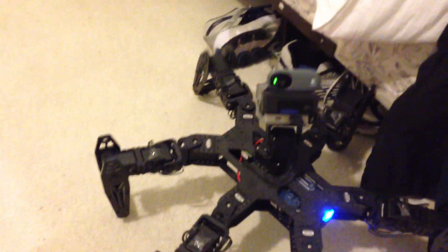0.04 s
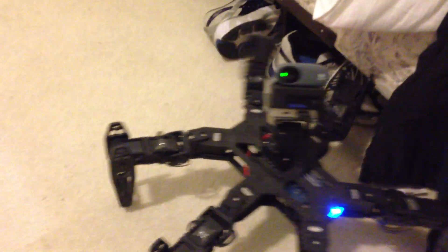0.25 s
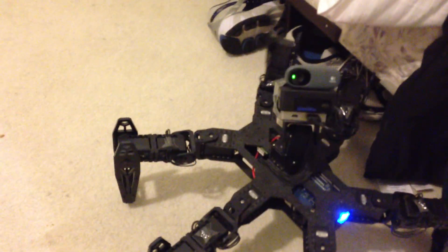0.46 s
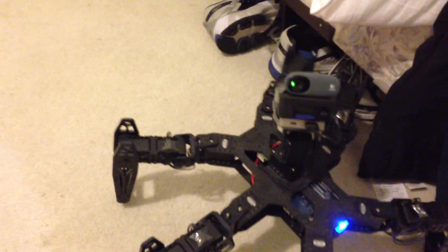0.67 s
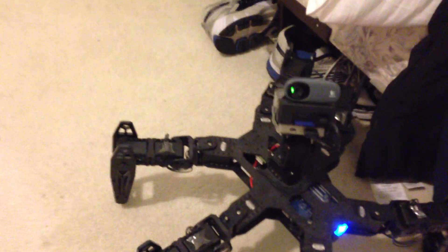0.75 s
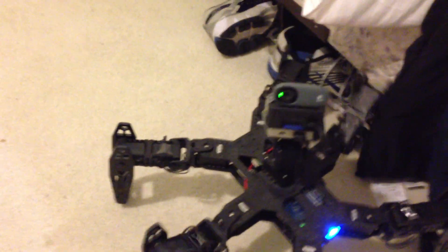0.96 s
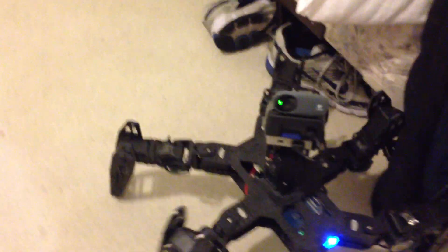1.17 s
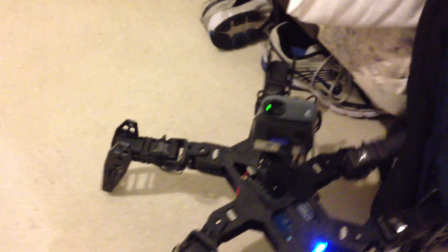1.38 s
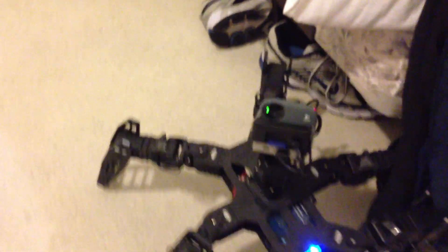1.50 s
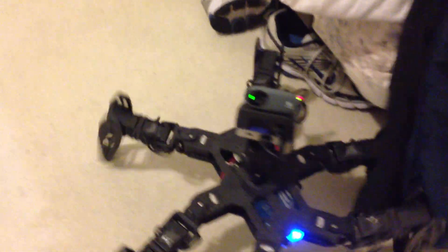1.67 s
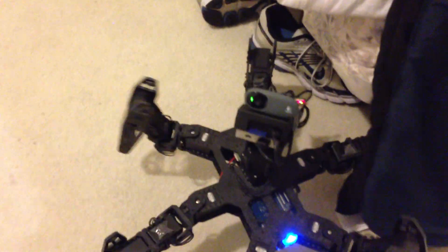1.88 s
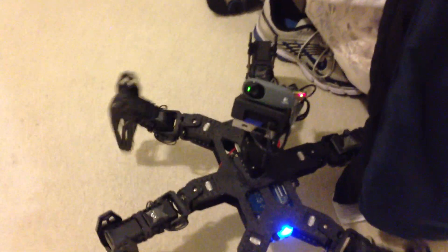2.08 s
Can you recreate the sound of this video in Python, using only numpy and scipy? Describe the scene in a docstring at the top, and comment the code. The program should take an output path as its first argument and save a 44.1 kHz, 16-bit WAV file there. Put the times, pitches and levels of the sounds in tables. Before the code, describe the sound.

A walking robot's servo motors rasp and whine in quick, even surges, with tiny gear squeaks. A few light plastic foot taps come around the middle. It is heard from about a metre in a small carpeted room with faint hiss.

```python
"""Six-legged robot walking on carpet

The robot walks about a metre away in a small, quiet room. On each stride its servos (the motors
in its joints) speed up and slow down, so their gear teeth rasp and whine, and the speed ripples
with every position command. Gears squeak, the leg frames ring along, the body rumbles and the
plastic feet tap now and then, over a faint hiss and hum."""
import sys
import numpy as np
from scipy import signal
from scipy.fft import rfft, irfft
from scipy.io import wavfile
from scipy.ndimage import uniform_filter1d

SR = 44100
rng = np.random.default_rng(int(sys.argv[2]) if len(sys.argv) > 2 else 0)


def materialize(psi):
    """Save the field psi as 16-bit PCM at rate SR to the path in sys.argv[1].

    A 1-D psi becomes a single channel; in a 2-D psi each row is a channel.
    """
    bounded = np.clip(np.atleast_2d(psi).T, -1, 1)
    quanta = np.round(bounded * 32767).astype(np.int16)
    wavfile.write(sys.argv[1], SR, quanta)


N = 94506

# The tone of the room's hiss. Each row: frequency in Hz, relative level in dB.
HISS_COLOUR = [(30, -24.5), (60, -16), (100, -8), (150, -3), (240, -1.5), (450, -8), (800, -8.5),
               (1500, -13.5), (2500, -13.5), (4000, -7.5), (7000, -21.5), (10000, -11.5), (15000, -21.5)]
# How loud the body rumbles. Each row: time in seconds, level in dB.
RUMBLE_LEVELS = [(0, -75.5), (.4, -87), (.5, -77.5), (.66, -70.5), (.76, -67.5), (.88, -76.5), (1.08, -73),
                 (1.25, -73), (1.4, -72.5), (1.6, -73.5), (1.8, -67.5), (2.14, -94)]
# The tone of the rumble. Each row: frequency in Hz, relative level in dB.
RUMBLE_COLOUR = [(100, -36.5), (160, -8.5), (205, 2.5), (270, -2.5), (340, 1), (480, -6.5), (800, -8),
                 (1400, -35.5)]
# Swells of ringing in the legs. Each row: start, peak and end in seconds, pitch in Hz, width in Hz,
# level in dB. Only rows whose times are in order give a full swell.
FRAME_RINGS = [(0.1453, 0.1336, 0.181, 2277, 78, -46), (0.0975, 0.1344, 0.272, 2950, 58, -58.5),
               (0.205, 0.25, 0.249, 2570, 197, -55.5), (0.18, 0.385, 0.415, 5870, 110, -58.5),
               (0.454, 0.5894, 0.607, 207.4, 56.3, -64.5), (0.4775, 0.494, 0.55, 1330, 810, -66.5),
               (0.4926, 0.564, 0.793, 5280, 414, -51.5), (0.61, 0.745, 0.833, 5524, 374, -56.5),
               (0.608, 0.606, 0.708, 4600, 350, -50), (0.58, 0.678, 0.697, 2290, 147, -57),
               (1.731, 1.72, 1.745, 2640, 300, -55.5), (1.682, 1.766, 1.827, 2400, 89, -59),
               (1.8, 1.63, 1.95, 4360, 1020, -47.5)]
# Feet landing. Each row: start in seconds, level in dB, pitch of the knock in Hz.
FOOT_TAPS = [(.7784, -33.5, 1800), (.7812, -45, 1050), (.985, -50.5, 1300), (.999, -49, 1200),
             (1.0165, -46, 1150), (1.190, -54, 1700), (1.2035, -41.5, 2200)]
# The notes of a struck leg. Each row: pitch in Hz, relative level in dB, seconds to fade by 60 dB.
LEG_NOTES = [(871, -16.5, 0.1), (978, -9.5, 0.0396), (1285, -19.5, 0.054), (1793, -22.5, 0.0296),
             (1974, -40, 0.032), (2755, -13, 0.034), (3220, -10.5, 0.0116)]
# The strides. Each row: start and end, then the rasp's rise and fall times, all in seconds; levels in dB
# of the rasp's body, treble and low mids; relative level in dB of the other servos' whine.
STRIDES = [(-.28, 0.056, .12, 0.1466, -47.5, -62, -55, -48.5),
           (0.069, 0.454, 0.1208, 0.1495, -52, -56.5, -63, -58),
           (.47, 0.842, 0.1493, 0.152, -52, -56, -64, -63.5),
           (0.844, 1.249, 0.1488, 0.1592, -50, -55.5, -63, -59),
           (1.248, 1.601, 0.0967, 0.1185, -52, -54.5, -65, -57),
           (1.616, 2.009, .11, 0.1815, -51, -54.5, -62.5, -58.5),
           (2.012, 2.38, 0.1277, .14, -51.5, -57, -67, -57)]
# The timing of the speed ripple. Each entry: the time in seconds of one crest, for one stride.
RIPPLE_CRESTS = [-.1, .249, .651, 1.061, 1.441, 1.771, 2.125]
# The rasp of servos holding a pose. The entries: body, treble and low mids, in dB.
HOLDING_DB = (-69.5, -79, -75)
# How steeply the rasp grows with effort. The entries: exponents for body, treble and low mids.
RASP_STEEPNESS = (1.937, 2.57, 1.38)
# The tone of the rasp through the gearbox cases. Each row: frequency in Hz, relative level in dB.
RASP_COLOUR = [(500, -26), (800, -22), (1200, -19.5), (1700, -10.5), (2300, -11.5), (2900, -10), (3250, -7),
               (3900, -2.5), (4700, -2), (5400, 1.5), (6200, -2.5), (7100, -2.5), (8000, -6), (9200, -16.5),
               (10500, -14), (12500, -10.5), (14400, -5.5), (15400, -5.5)]
# The tones in a whine. Each row: multiple of the tooth rate (teeth meeting a second), relative level in dB.
HARMONICS = [(1, -15), (2, -4.5), (3, -4.5), (4, -20), (5, -22), (6, -12)]
# Where a servo's case gives off sound best. Each row: frequency in Hz, width in Hz, boost in dB.
CASE_PEAKS = [(2770, 200, 6), (6970, 1640, 7)]
# The loudest servo, one list for each stride it leads.
# Each row: time in seconds, tooth rate in Hz, relative level in dB.
LEAD_WHINE = [
    [(.11, 1480, -63), (.15, 1450, -61), (.175, 1830, -60), (.205, 1960, -56), (.225, 2150, -59),
     (.25, 2350, -55), (.30, 1750, -60), (.39, 1400, -63)],
    [(.56, 1850, -66), (.61, 2150, -57), (.65, 2130, -57), (.68, 2080, -60), (.703, 2040, -52),
     (.725, 1740, -57), (.752, 1300, -58), (.775, 1250, -68)],
    [(.905, 1450, -62), (.935, 1320, -56), (.96, 1580, -60), (.987, 1990, -52), (1.012, 2330, -49),
     (1.04, 2210, -51), (1.064, 2340, -45), (1.087, 2190, -48), (1.108, 1990, -51), (1.137, 1730, -53),
     (1.15, 1680, -63)],
    [(1.29, 2100, -64), (1.32, 1950, -58), (1.34, 2150, -55), (1.365, 2100, -64), (1.39, 2200, -56),
     (1.442, 2280, -53), (1.47, 1850, -60), (1.495, 1480, -59), (1.52, 1320, -58), (1.565, 1350, -66)],
    [(1.68, 2000, -65), (1.735, 2200, -54), (1.752, 2240, -48), (1.772, 2300, -46), (1.797, 2280, -46),
     (1.806, 2090, -52), (1.82, 2060, -48), (1.85, 1840, -52), (1.873, 2230, -53), (1.905, 2150, -55),
     (1.925, 1950, -64)],
]

HISS_DB, HUM_HZ, HUM_DB = -66, 120, -83.5
COMMAND_HZ = 40.3  # position commands a second


def undb(db):
    """Turn decibels into a gain."""
    return 10 ** (np.asarray(db) / 20)


def unit(x):
    """Scale a sound to an average power of 1."""
    return x / np.sqrt(np.mean(x ** 2) + 1e-20)


def clock():
    """The time of each sample in seconds."""
    return np.arange(N) / SR


def noise():
    """Fresh white noise."""
    return rng.standard_normal(N)


def wobble(hz):
    """A smooth random wobble of about size 1, mostly slower than hz."""
    f = np.fft.rfftfreq(N, 1 / SR)
    return unit(irfft(rfft(noise()) / (1 + (f / hz) ** 2) ** 2, N))


def colour(x, points):
    """Shape a sound's tone by (Hz, dB) points, then scale it to a power of 1."""
    hz, db = np.array(points, float).T
    f = np.fft.rfftfreq(N, 1 / SR) + 1
    return unit(irfft(rfft(x) * undb(np.interp(np.log(f), np.log(hz), db)), N))


def band(x, low_hz, high_hz):
    """Keep only the frequencies between two limits."""
    f = np.fft.rfftfreq(N, 1 / SR)
    return irfft(rfft(x) * ((f >= low_hz) & (f < high_hz)), N)


def ringing_noise(hz, width_hz):
    """Noise filtered twice so that it rings around one pitch."""
    peak = signal.iirpeak(hz, hz / width_hz, fs=SR)
    return unit(signal.lfilter(*peak, signal.lfilter(*peak, noise())))


def room_tone():
    """A steady hiss and the hum of mains power."""
    hiss = undb(HISS_DB) * colour(noise(), HISS_COLOUR)
    hum = undb(HUM_DB) * np.sqrt(2) * np.sin(2 * np.pi * HUM_HZ * clock())
    return hiss + hum


def room_echo(x, delay_s=0.0019, fade_s=0.173, echo_db=-14):
    """Add the short reflections of a carpeted room, which drop by 60 dB in fade_s."""
    t = clock()
    tail = noise() * np.exp(-np.log(1000) * t / fade_s) * (t > delay_s)
    return x + undb(echo_db) * signal.fftconvolve(x, tail / np.sqrt(np.sum(tail ** 2)))[:N]


def body_rumble():
    """The robot's body shudders as its weight shifts."""
    times, db = np.array(RUMBLE_LEVELS).T
    return colour(noise(), RUMBLE_COLOUR) * undb(np.interp(clock(), times, db))


def frame_rings():
    """The leg frames ring under load, swelling and fading."""
    out = 0
    for start, peak, end, hz, width_hz, db in FRAME_RINGS:
        ring = ringing_noise(hz, width_hz)
        ring /= np.sqrt(uniform_filter1d(ring ** 2, size=900) + 1e-6)  # even out the loudness
        out += ring * undb(db) * np.interp(clock(), [start, peak, end], [0, 1, 0])
    return out


def fade(age, seconds):
    """Silence until age 0, then a level that drops by 60 dB in the given time."""
    return np.exp(-np.log(1000) * age / seconds) * (age > 0)


def foot_taps(knock_s=0.0046, rattle_s=0.0553, rattle_db=-13, reach_octaves=1.034, low_cut_hz=440):
    """Each landing foot knocks, rattles briefly and rings the leg's notes near the knock's pitch."""
    out = 0
    for start, db, hz in FOOT_TAPS:
        age = np.maximum(clock() - start, 0)
        attack = 1 - np.exp(-age / .00015)
        knock = np.sin(2 * np.pi * hz * age) * fade(age, knock_s) * attack
        ring = 0
        for note_hz, note_db, note_s in LEG_NOTES:
            nearness = np.exp(-(np.log2(note_hz / hz) / reach_octaves) ** 2)
            ring += undb(note_db) * nearness * np.sin(2 * np.pi * note_hz * age) * fade(age, note_s)
        rattle = ringing_noise(hz, width_hz=0.68 * hz) * fade(age, rattle_s)
        out += undb(db) * (knock + ring + undb(rattle_db) * rattle)
    return signal.sosfilt(signal.butter(2, low_cut_hz, "high", fs=SR, output="sos"), out)


def gait():
    """Speed and rasp rise and fall in each stride, which also sets the whine's gain and ripple timing."""
    t = clock()
    speed, whine_gain, crest = np.zeros((3, N))
    rasp_gains = np.zeros((3, N))
    steepness = np.array(RASP_STEEPNESS)[:, None]
    for (start, end, rise_s, fall_s, *rasp_db, whine_db), crest_s in zip(STRIDES, RIPPLE_CRESTS):
        moving = (t >= start) & (t < end)
        speed[moving] = np.sin(np.pi * (t[moving] - start) / (end - start))
        whine_gain[moving], crest[moving] = undb(whine_db), crest_s
        effort = np.clip((t - start) / rise_s, 0, 1) * np.clip((end - t) / fall_s, 0, 1)
        rasp_gains += undb(rasp_db)[:, None] * np.sin(np.pi / 2 * effort) ** steepness
    return speed, whine_gain, crest, np.hypot(rasp_gains, undb(HOLDING_DB)[:, None])


def gear_squeaks(per_second=1100, typical_s=0.01286, glide=0.0507, low_hz=2000, high_hz=15000):
    """Tiny gliding squeaks as pairs of gears catch and let go."""
    out = np.zeros(N + SR)
    for when, pitch, length, bend, size in rng.random((int(per_second * N / SR), 5)):
        age = np.arange(int(SR * typical_s * (.5 + length))) / SR
        start_hz = low_hz + (high_hz - low_hz) * pitch
        hz = start_hz * (1 + glide * (2 * bend - 1) * age / typical_s)
        gain = undb(-1.5 * np.log(max(size, .03)))  # a few squeaks stand out
        i = int(when * N)
        out[i:i + len(age)] += gain * np.hanning(len(age)) * np.sin(2 * np.pi * np.cumsum(hz) / SR)
    return unit(out[:N])


def command_ripple(crest):
    """A wave that swings once for every position command."""
    return np.cos(2 * np.pi * COMMAND_HZ * (clock() - crest))


def gear_rasp(clicks, crest, gains, slide_db=-0.5, squeak_db=0.5, throb_db=2, flutter_db=1.08):
    """Tooth clicks, sliding friction and squeaks pass through the cases, throbbing with the commands."""
    throb = undb(flutter_db * wobble(120) - throb_db * command_ripple(crest))
    gears = clicks + undb(slide_db) * noise() + undb(squeak_db) * gear_squeaks()
    rasp = colour(gears * throb, RASP_COLOUR)
    body, treble, low_mids = band(rasp, 3000, 9000), band(rasp, 9000, 16000), band(rasp, 500, 3000)
    out = 0
    for part, gain in zip((body, treble, low_mids), gains):
        drift_db = 0.9831 * wobble(27)
        out += unit(part) * gain * undb(drift_db)
    return out


def gear_motion(hz, crest, ripple=.06, jitter=.014):
    """Teeth passed so far, and their rate: it surges with each command and jitters with gear slack."""
    rate = hz * (1 + ripple * command_ripple(crest) + jitter * wobble(701))
    return np.cumsum(rate) / SR, rate


def gear_whine(hz, crest, flicker_db=3.0):
    """Meeting teeth make flickering tones, each louder as it crosses a peak of the case."""
    teeth_passed, rate = gear_motion(hz, crest)
    out = 0
    for multiple, db in HARMONICS:
        boost_db = sum(peak_db / (1 + ((multiple * rate - peak_hz) / width_hz) ** 2)
                       for peak_hz, width_hz, peak_db in CASE_PEAKS)
        gain = undb(db + boost_db + flicker_db * wobble(133.3))
        out += gain * np.sin(2 * np.pi * multiple * teeth_passed)
    return out


def other_servos(speed, gain, crest, count=3, base_hz=2200.3, spread=.22, wander=.05, whine_db=-2):
    """The other joints, each at its own speed, give a whine and an uneven click for every tooth."""
    whine, clicks = 0, np.zeros(N)
    pace = .5 + .5 * speed  # half the rate at the ends of a stride
    for share in np.linspace(1 - spread, 1 + spread / 2, count):
        hz = base_hz * share * pace * (1 + wander * wobble(15))
        lag_s = rng.random() / COMMAND_HZ / 2
        whine += gear_whine(hz, crest + lag_s)
        teeth_passed, _ = gear_motion(hz, crest)
        strikes = np.diff(np.floor(teeth_passed), prepend=0)
        clicks += strikes * noise() * undb(3 * np.tanh(wobble(900) / 2))  # up to 3 dB of extra scatter
    return undb(whine_db) * whine / np.sqrt(count) * gain * speed ** 2, unit(clicks)


def lead_servo(crest, fade_s=0.0243):
    """The servo that works hardest in a stride whines above the rest."""
    t, gain = clock(), 0
    for stride in LEAD_WHINE:
        times, _, db = np.array(stride).T
        inside_s = np.minimum(t - times[0], times[-1] - t)  # negative outside this stride's rows
        gain += undb(np.interp(t, times, db)) * np.clip(1 + inside_s / fade_s, 0, 1)
    times, hz, _ = np.concatenate(LEAD_WHINE).T
    return gain * gear_whine(np.interp(t, times, hz), crest)


def scene():
    """Mix the walking robot with the quiet room, in one channel."""
    speed, whine_gain, crest, rasp_gains = gait()
    other_whine, clicks = other_servos(speed, whine_gain, crest)
    echoing = room_echo(lead_servo(crest) + other_whine + frame_rings() + foot_taps())
    robot = echoing + gear_rasp(clicks, crest, rasp_gains) + body_rumble()
    return (robot + room_tone())[None]


def record(dry):
    """Cut away the highest treble, above 15380 Hz."""
    return signal.sosfilt(signal.ellip(14, .1, 80, 15380, fs=SR, output="sos"), dry)


dry = scene()
out = record(dry)
materialize(out)
```